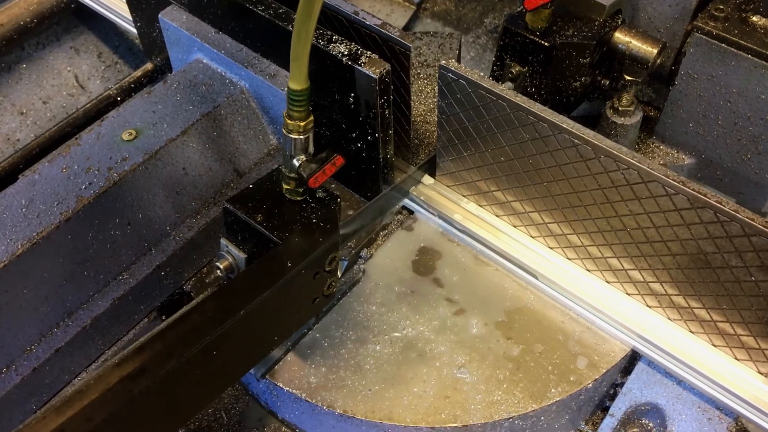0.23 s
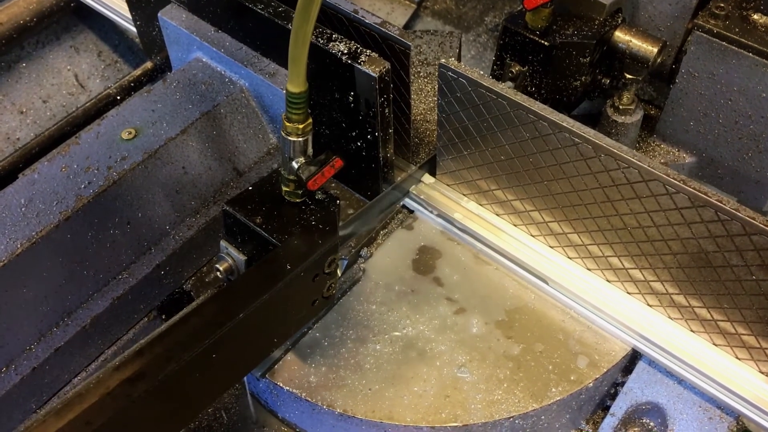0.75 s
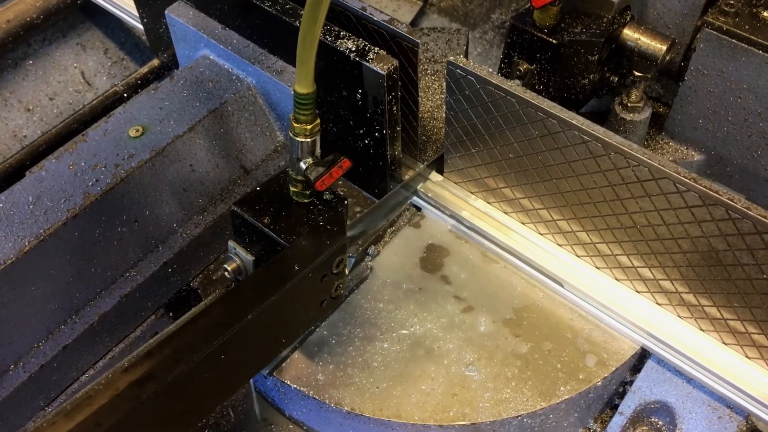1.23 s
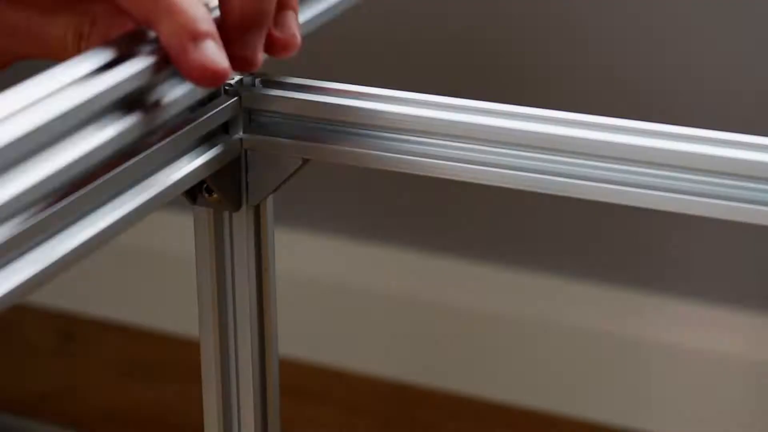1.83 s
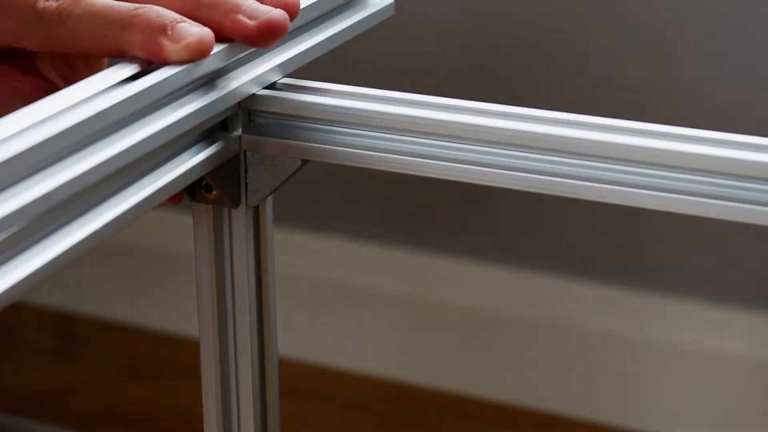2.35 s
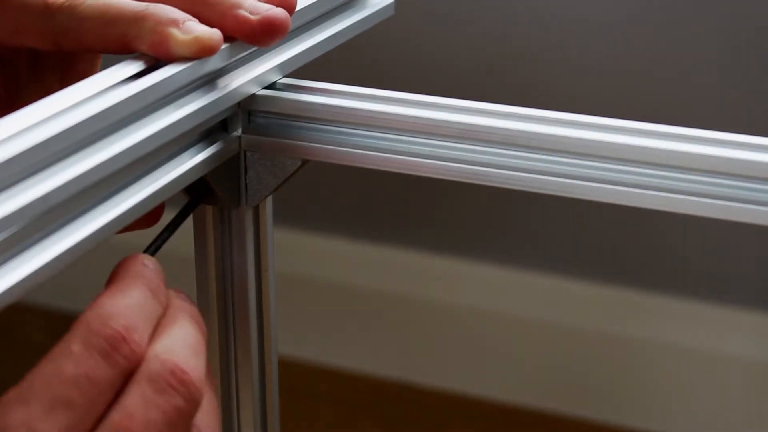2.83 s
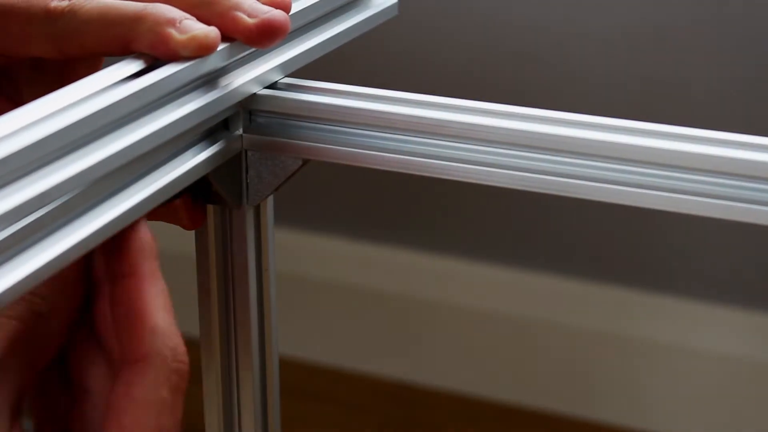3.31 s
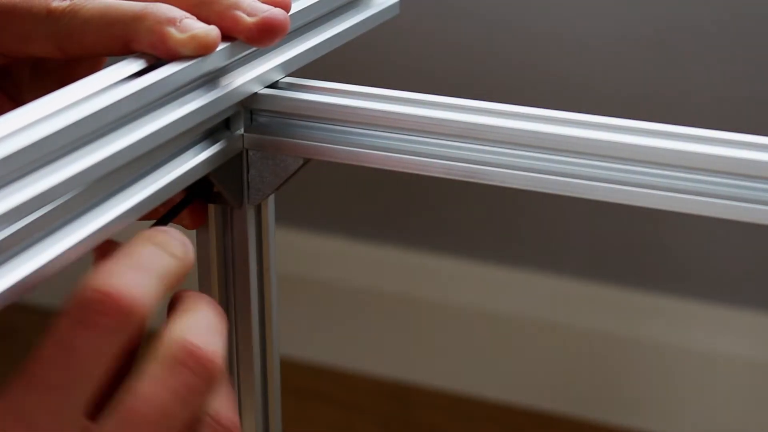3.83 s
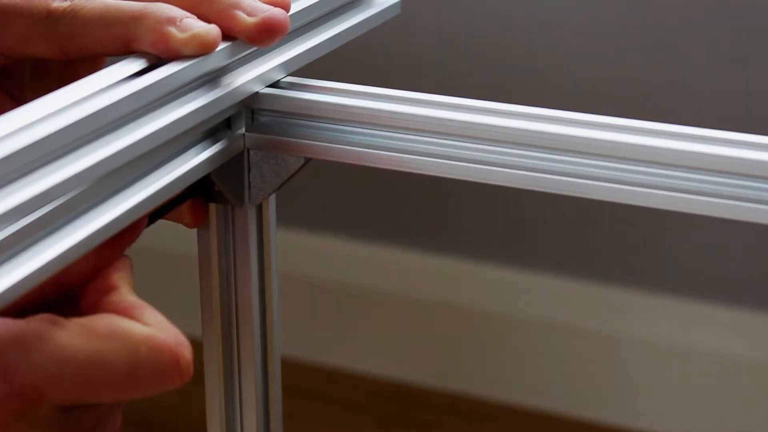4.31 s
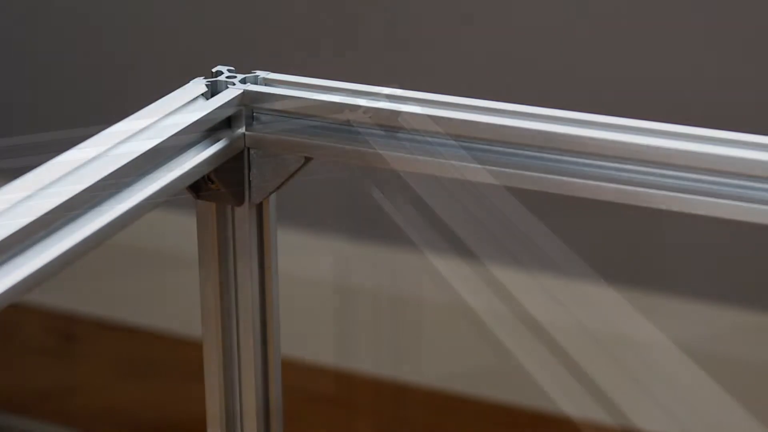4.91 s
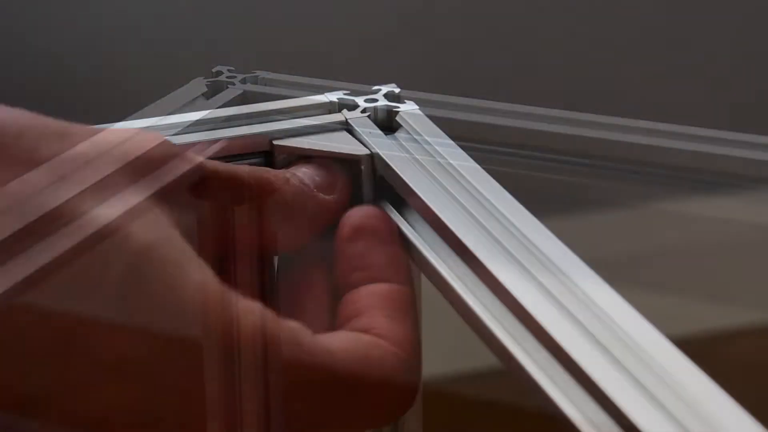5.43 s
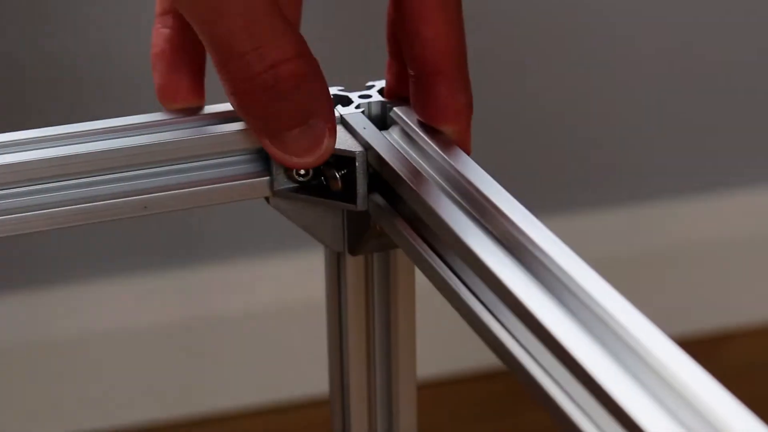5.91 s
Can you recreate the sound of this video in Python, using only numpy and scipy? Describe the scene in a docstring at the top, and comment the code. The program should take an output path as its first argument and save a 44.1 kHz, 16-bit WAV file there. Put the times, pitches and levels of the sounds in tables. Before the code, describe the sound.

First, close and loud, a saw blade whines and rasps through metal with wavering singing tones over a low motor hum. The sound cuts instantly to a faint hissy room. Hard aluminium knocks come first, then sparse small tool ticks and soft bumps, a sharp burst of clatter, snaps and scraping, and finally dull pats, finger rubs and tiny clicks. Close, centred, with a short room tail.

```python
"""A circular saw sings and hisses through an aluminium extrusion and stops abruptly; in a quiet room a bar is laid
on an aluminium frame, a hex key ticks in a corner bracket, the bar clatters off, fingers fit another bracket.
Saw: uneven tooth strokes drive tooth-rate partials, chatter, chip hiss, work and blade resonances; sines add hum.
Assembly: knocks and ticks are noise clashes with fading modes, slides are coloured grit, snaps are single swings.
Bumps wake low frame modes, rubs are filtered noise, and a short room tail follows the contacts; the channels match."""
import sys
import numpy as np
from scipy import signal
from scipy.fft import rfft, irfft
from scipy.io import wavfile
from scipy.ndimage import uniform_filter1d, map_coordinates

SR = 44100
rng = np.random.default_rng(int(sys.argv[2]) if len(sys.argv) > 2 else 0)


def master_out(mix):
    """Clip the mix to full scale and print it as 16-bit PCM to the path in sys.argv[1]."""
    frames = np.transpose(np.atleast_2d(mix))
    ceiling = np.clip(frames, -1, 1)
    pcm = np.round(ceiling * 32767).astype(np.int16)
    wavfile.write(sys.argv[1], SR, pcm)


N = 272097
TIME = np.arange(N) / SR
AGE = TIME[:SR // 2]  # time since a contact began
SAW_STOP_S = 1.758

# load on the blade, which rises where it meets thicker walls of the profile: t/s, load/dB
LOAD = [(0, -18.5), (0.035, -29.5), (0.11, -29.5), (0.17, -25), (0.34, -25.5), (0.48, -24), (0.56, -26.5),
        (0.64, -21), (0.85, -25.5), (0.98, -25.5), (1.1, -28.5), (1.33, -25), (1.75, -27)]
# colour of rubbing and of dull pats: f/Hz, relative level per Hz/dB
RUB_COLOUR = [(80, -30), (230, -10), (400, -16.5), (560, 2.5), (800, -6), (2200, -3.5), (4500, -10.5),
              (15500, -13.5)]


def amp(db):
    """Decibels to gain."""
    return 10 ** (np.asarray(db) / 20)


def unit(x):
    """Scale to rms 1."""
    return x / np.sqrt(np.mean(x ** 2))


def sine(phase):
    """Sine at rms 1 from a phase in radians."""
    return np.sqrt(2) * np.sin(phase)


def curve(table):
    """The (time, value) points of a table, joined by straight lines."""
    times, values = np.transpose(table)
    return np.interp(TIME, times, values)


def wander(rate):
    """Smooth chance with spread 1 that changes about rate times a second."""
    spectrum = rfft(rng.standard_normal(N))
    hz = np.arange(len(spectrum)) * SR / N
    return unit(irfft(spectrum * np.exp(-(hz / rate) ** 2), N))


def colour(x, points, tilt_db=0, patchy_db=0, patch_hz=260, size=2048):
    """Causal filter through (Hz, dB) points, with tilt per octave and chance resonances; white noise keeps its power."""
    hz, db = np.transpose(points)
    bins = np.fft.rfftfreq(size, 1 / SR)
    octave = np.log2(np.maximum(bins, 20))
    patches = np.interp(bins, patch_hz * np.arange(len(bins)), rng.standard_normal(len(bins)))
    shape_db = np.interp(octave, np.log2(hz), db)
    tilted_db = tilt_db * np.maximum(octave, np.log2(500))  # flat below 500 Hz
    gain = amp(shape_db + tilted_db + patchy_db * patches)
    # folding the cepstrum gives minimum phase: no sound ahead of its cause
    cepstrum = irfft(np.log(gain))
    cepstrum[1:size // 2] *= 2
    cepstrum[size // 2 + 1:] = 0
    response = irfft(np.exp(rfft(cepstrum)))
    return signal.fftconvolve(x, response / np.linalg.norm(response))[:len(x)]


def resonate(x, hz, width):
    """One resonance driven by x, at rms 1."""
    return unit(signal.lfilter(*signal.iirpeak(hz, hz / width, SR), x))


def add(track, s, sound):
    """Mix a sound into the track from time s."""
    start = int(s * SR)
    track[start:start + len(sound)] += sound[:N - start]


def swell(rise, t60, length=0):
    """Envelope of a contact: it builds, lasts, then dies away."""
    build = np.minimum(AGE / max(rise, 1 / SR), 1)
    fading_time = np.maximum(AGE - max(rise, length), 0)
    return build * np.exp(-np.log(1000) * fading_time / t60)


def grit(rough_db):
    """Noise made of tiny contacts of unequal size, under a millisecond each."""
    sizes = np.repeat(amp(rough_db * rng.standard_normal(len(AGE))), 32)[:len(AGE)]
    return unit(sizes * rng.standard_normal(len(AGE)))


def ring(modes, rise, tilt_db=0, longest=np.inf, scatter_db=2.5):
    """Fading modes; each blow shares its energy a little differently."""
    mode_hz, mode_db, mode_t60 = np.transpose(modes)
    gains = amp(mode_db + tilt_db * np.log2(mode_hz) + scatter_db * rng.standard_normal(len(mode_hz)))
    gains *= np.sqrt(2) / np.linalg.norm(gains)
    total = np.zeros(len(AGE))
    for gain, hz, t60 in zip(gains, mode_hz, mode_t60):
        tone = np.sin(2 * np.pi * (hz * AGE + rng.random()))
        total += gain * swell(rise, min(t60, longest)) * tone
    return total


def blow(clash, modes, rise, tilt_db, clash_t60, clash_db, ring_db, longest):
    """Metal on metal: a short clash whose resonances vary by the spot struck, and the part's own modes ringing on."""
    contact = grit(rough_db=1.0) * swell(rise, clash_t60)
    crash = colour(contact, clash, tilt_db, patchy_db=4.5, patch_hz=210)
    return amp(clash_db) * crash + amp(ring_db) * ring(modes, rise, tilt_db, longest)


def room_tone():
    """Quiet hiss of filtered noise with a faint low drone whose phase drifts."""
    # hiss colour: f/Hz, relative level per Hz/dB
    hiss_colour = [(50, -42), (105, -11), (150, -16), (235, -2), (330, -11.5), (550, 2), (4000, -8.5),
                   (15500, -13.5)]
    hiss = amp(-55) * colour(rng.standard_normal(N), hiss_colour)
    drone = amp(-77.5) * np.sin(2 * np.pi * 106 * TIME + wander(3.5))
    return hiss + drone


def walls(x, t60, wet_db):
    """The short, duller answer of a small room: a fading noise tail."""
    burst = rng.standard_normal(len(AGE)) * swell(rise=0.042, t60=t60)
    tail = colour(burst, [(500, 0), (4000, -6.0), (15000, -13)])
    return x + amp(wet_db) * signal.fftconvolve(x, tail / np.linalg.norm(tail))[:N]


def rubbing():
    """Uneven friction of fingers and bar along the frame, in strokes that build, last and fade."""
    # strokes: t/s, length/s, level/dB
    strokes = [(1.851, 0.079, -49.5), (2.54, 0.1, -55.5), (2.8, .28, -53), (4.967, 0.22, -44),
               (5.214, 0.095, -50.5), (5.8, 0.1, -48.5), (5.976, 0.24, -51.5)]
    pressure = np.zeros(N)
    for s, length, db in strokes:
        add(pressure, s, amp(db) * swell(rise=0.013, t60=0.29, length=length))
    friction = rng.standard_normal(N) * amp(2.7 * wander(125))
    return pressure * unit(colour(friction, RUB_COLOUR))


def bumps():
    """Soft pushes give a dull pat and wake the low bending of the frame, or rock it as a whole."""
    # hands bump the frame: t/s, nominal level/dB
    pushes = [(2.116, -33), (2.275, -40), (2.336, -37.5), (2.381, -43), (3.141, -43), (3.225, -38),
              (4.955, -32), (5.143, -26.5), (5.496, -37), (5.659, -29), (5.735, -29), (5.788, -39.5),
              (5.85, -38), (5.93, -39)]
    # bending modes of the frame: f/Hz, relative level/dB, t60/s
    bending = [(488, -4, 0.14), (546, 3, 0.066), (621, 3, 0.093), (700, 7, 0.018), (733, -16, 0.16),
               (1100, -5, 0.05)]
    # the whole frame rocks on its support: t/s, level/dB
    thuds = [(4.613, -53), (5.027, -53), (5.16, -57), (5.88, -58)]
    # modes of that rocking: f/Hz, relative level/dB, t60/s
    rocking = [(122, 2.5, 0.14), (248, 6, 0.18)]
    track = np.zeros(N)
    for s, db in pushes:
        push = rng.standard_normal(len(AGE)) * swell(rise=0.002, t60=0.072)
        pat = colour(push, RUB_COLOUR, tilt_db=-3.5)
        add(track, s, amp(db) * (amp(-5.0) * ring(bending, rise=0.0021) + amp(-10.0) * pat))
    for s, db in thuds:
        add(track, s, amp(db) * ring(rocking, rise=0.0055))
    return track


def zings():
    """Light sliding wakes one thin resonance of key or bracket for as long as the parts slide."""
    # slides: t/s, level/dB, length/s, resonance f/Hz
    thin_slides = [(3.034, -51, 0.013, 4350), (5.053, -28.5, 0.011, 7970), (5.111, -48, 0.071, 7360),
                   (5.45, -48, 0.0066, 4760), (5.795, -50.5, 0.087, 7900), (5.978, -56, 0.055, 7760)]
    track = np.zeros(N)
    for s, db, length, hz in thin_slides:
        tone = resonate(resonate(grit(rough_db=3.5), hz, 600), hz, 600)  # twice through: steeper sides
        add(track, s, amp(db) * tone * swell(rise=0.0049, t60=0.039, length=length))
    return track


def scrapes():
    """Metal edges slide on each other: dense slips, coloured by the stiffness of the contact."""
    # slides: t/s, level/dB, length/s, contact pitch f/Hz
    slides = [(2.472, -51, 0.028, 2000), (2.834, -40.5, 0.021, 2720), (3.381, -52, 0.023, 7000),
              (3.638, -51.5, 0.018, 1850), (4.761, -26, 0.0049, 2970), (4.82, -22.5, 0.013, 2970),
              (4.828, -27.5, 0.05, 3100), (4.887, -35.5, 0.004, 1490), (4.914, -31, 0.0066, 2500),
              (4.9195, -20.5, 0.0017, 1860), (4.925, -24, 0.033, 1810), (4.952, -24.5, 0.003, 9100),
              (4.998, -32, 0.0018, 1650), (5.046, -37, 0.015, 2260), (5.322, -43, 0.087, 7600),
              (5.493, -36.5, 0.031, 9700), (5.852, -30.5, 0.046, 14000), (5.878, -33, 0.019, 2630),
              (6.126, -37.5, 0.065, 8550)]
    # slip colour: multiple of the contact pitch, relative level per Hz/dB
    slip_colour = np.array([(.15, -27), (.55, -1.5), (.9, 11), (1.2, 8.5), (1.7, 3), (6, -2.5)])
    ease_s = 0.14  # a slide this long builds all the way through; shorter ones start ever more abruptly
    even_hz, stiff_tilt_db = 2130, 4  # stiffer contacts are brighter, by up to this many dB per octave
    track = np.zeros(N)
    for s, db, length, hz in slides:
        rise = length ** 2 / ease_s
        tilt_db = stiff_tilt_db * np.tanh(2 * np.log2(hz / even_hz))
        slips = grit(rough_db=2.8) * swell(rise, t60=0.1, length=length)
        scrape = colour(slips, slip_colour * [hz, 1], tilt_db, patchy_db=6.5, patch_hz=152.0)
        add(track, s, amp(db) * scrape)
    return track


def snaps():
    """An edge catches or breaks free with a dry snap: one sharp swing of the metal, with its bass removed."""
    # snaps: t/s, peak level ahead of the high-pass/dB, f/Hz
    catches = [(4.364, -29, 10000), (4.762, -15, 4000), (4.8222, -12, 5500), (4.9208, -4.5, 2200),
               (4.9995, -19, 2400), (4.9566, -10, 10000), (5.0592, -18, 6000), (5.4512, -19, 9000),
               (5.5935, -25, 8000)]
    peak_cycles = 0.5  # the swing's envelope peaks after half a cycle
    track = np.zeros(N)
    for s, db, hz in catches:
        age = AGE * hz / peak_cycles
        swing = age * np.exp(1 - age) * np.cos(2 * np.pi * hz * AGE)
        high_pass = signal.butter(2, hz / 2, "high", fs=SR)
        add(track, s, amp(db) * signal.lfilter(*high_pass, swing))
    return track


def ticks():
    """Key and bolt tap the bracket, which the fingers keep from ringing long."""
    # taps: t/s, nominal level/dB, brightness/dB per octave
    taps = [(2.213, -47, -3.5), (2.285, -44, -5.5), (2.319, -35.5, -3), (2.342, -44, -5), (2.73, -38, 2.5),
            (2.793, -29.5, 6), (2.812, -30.5, 4.5), (2.902, -26.5, 14), (2.912, -30, -1), (2.998, -34, 3.5),
            (3.139, -31, 2), (3.209, -38, 0), (3.221, -23.5, -0.5), (3.256, -34.5, -1), (3.433, -39.5, -5),
            (4.362, -44, 0.5), (4.444, -44.5, -2), (5.320, -32, 2.5), (5.439, -32, 3), (5.4498, -23.5, 2.5),
            (5.497, -37, -6), (5.579, -40.5, -5.5), (5.591, -28, 2), (5.658, -35.5, -6), (6.048, -41.5, 2)]
    # clash colour: f/Hz, relative level per Hz/dB
    tap_colour = [(90, -42), (350, -22), (600, -9), (3800, -2.5), (5400, -5.5), (8500, 1.5), (15500, 1)]
    # modes of the corner bracket: f/Hz, relative level/dB, t60/s
    bracket = [(2740, 6.5, 0.12), (3770, 3.5, 0.17), (4760, 4, 0.16), (6500, 12.5, 0.096),
               (7940, 15.5, 0.096), (8270, 18, 0.082), (9340, 12, 0.066), (12200, 15, 0.07),
               (13900, 10, 0.054)]
    track = np.zeros(N)
    for s, db, tilt_db in taps:
        tap = blow(tap_colour, bracket, rise=0.0007, tilt_db=tilt_db,
                   clash_t60=0.091, clash_db=0.5, ring_db=-7, longest=0.23)
        add(track, s, amp(db) * tap)
    return track


def knocks():
    """The loose bar hits the frame: harder blows are brighter, the spot favours one mode, and the hand damps the ring."""
    # blows: t/s, nominal level/dB, longest t60 that the grip allows/s, f that the struck spot favours/Hz
    bar_blows = [(1.976, -21, 0.091, 6780), (1.989, -16.5, 0.13, 3246), (2.026, -34.5, 0.13, 8400),
                 (2.104, -22.5, 0.066, 7950), (2.159, -44, 0.091, 8060), (4.545, -25, 0.1, 2180),
                 (4.573, -32, 0.2, 8355), (4.590, -22, 0.064, 2180), (4.604, -15, 0.064, 9590),
                 (4.61, -15, 0.9, 4441), (4.622, -28, 0.13, 8400), (4.715, -41.5, 0.02, 7730)]
    # modes of the loose bar: f/Hz, relative level/dB, t60/s
    bar = [(1809, -19, 0.7), (2180, -2, 0.09), (2830, -1, 0.08), (3246, 1, 0.14), (3758, -2, 0.13),
           (4441, -5, 0.13), (5954, -7, 0.35), (6783, -2, 0.11), (7265, -4, 0.16), (7730, -3, 0.18),
           (8060, 3, 0.09), (8355, 3.5, 0.11), (9017, 2, 0.1), (9590, 1, 0.085), (10650, -3, 0.1),
           (11810, -2, 0.11)]
    # clash colour: f/Hz, relative level per Hz/dB
    clash = [(200, -45), (520, -0.5), (1400, -7.5), (2200, 2.5), (3400, 3.5), (5200, -4), (8400, -3),
             (15500, -4)]
    full_db, dulling = -34, 0.14  # tilt in dB per octave for each dB above or below full_db
    spot_gain_db, spot_octaves = 7, 0.06
    track = np.zeros(N)
    for s, db, longest, spot_hz in bar_blows:
        tilt_db = dulling * (db - full_db)
        modes = []
        for hz, mode_db, t60 in bar:
            closeness = np.exp(-(np.log2(hz / spot_hz) / spot_octaves) ** 2)
            modes.append((hz, mode_db + spot_gain_db * closeness, t60))
        knock = blow(clash, modes, rise=0.0019, tilt_db=tilt_db,
                     clash_t60=0.095, clash_db=-1.5, ring_db=-1.0, longest=longest)
        add(track, s, amp(db) * knock)
    return track


def hum_and_sidebands():
    """Low motor hum, plus two saw-tone sidebands near 1 and 1.3 kHz, with wavering levels and phases."""
    # hum and the two sidebands: f/Hz, usual level/dB
    tones = [(51, -46), (200, -47), (274, -55), (301, -46), (467, -54.5), (995, -39.5), (1292, -42.5)]
    total = np.zeros(N)
    for hz, db in tones:
        total += amp(db + 3.9 * wander(33)) * sine(2 * np.pi * hz * TIME + 0.31 * wander(19))
    return total


def work_and_blade_ring(force, chip_db):
    """Tooth strokes excite resonances: the work rings near 1220 Hz, the blade rings higher."""
    # resonances of work (first row) and blade: f/Hz, width/Hz, level against the chips/dB
    resonances = [(1220, 18, -12), (3350, 160, -12), (3930, 80, -14), (5450, 220, -11), (6650, 170, -16),
                  (7456, 140, -11), (9150, 220, -13.5), (10987, 160, -14)]
    total = np.zeros(N)
    for hz, width, db in resonances:
        total += amp(db + chip_db) * resonate(force * rng.standard_normal(N), hz, width)
    return total


def blade_whine():
    """The cut keeps one mode of the blade singing, with wavering level and phase."""
    return amp(-42.5 + 1.82 * wander(20)) * sine(2 * np.pi * 9180 * TIME + 0.4 * wander(9))


def tooth_strokes(teeth, sharpness, uneven_db, scatter_db, count=50):
    """Cutting force: one stroke a tooth; unequal teeth repeat with every turn of the blade."""
    index = teeth.astype(int)
    tooth_db = uneven_db * rng.standard_normal(count)[index % count]
    stroke_db = scatter_db * rng.standard_normal(N)[index]
    return unit(amp(tooth_db + stroke_db) * np.exp(-sharpness * (teeth % 1)))


def cutting_noise(teeth, turn_db, group_db, count=50, order=5):
    """Noise of the teeth: part is fresh, part repeats with each turn, part with each group of five teeth."""
    def repeating(period):
        """One noise pattern read round and round, once every period teeth."""
        pattern = rng.standard_normal(int(period * N / teeth[-1]))
        pattern = pattern - uniform_filter1d(pattern, size=100, mode="wrap")  # fine detail of tooth edges: no bass
        return unit(map_coordinates(pattern, [teeth / period % 1 * len(pattern)], mode="wrap"))
    fresh = rng.standard_normal(N)
    return unit(fresh + amp(turn_db) * repeating(count) + amp(group_db) * repeating(order))


def chip_hiss(force, teeth, chip_db):
    """The strokes tear off chips: force-shaped cutting noise, coloured bright."""
    # chip colour: f/Hz, relative level per Hz/dB
    chip_colour = [(2000, -1.5), (4200, 8), (4950, 0), (6000, 4.5), (7000, -2), (9900, 2.5), (10400, -5),
                   (11700, 2), (14200, -11), (15700, -2)]
    tearing = force * cutting_noise(teeth, turn_db=-4, group_db=-6.5)
    return colour(tearing, chip_colour) * amp(chip_db)


def work_chatter(force, teeth, load_db):
    """Teeth shake the work and vice, which answer through many narrow resonances and shudder briefly."""
    # chatter colour: f/Hz, relative level per Hz/dB
    chatter_colour = [(35, -28), (55, -14), (90, -4), (280, -5), (370, -13.5), (600, -12), (850, 3.5),
                      (2100, 5.5), (2700, 1.5), (3900, -12), (5000, -18), (15000, -11)]
    # the work shudders briefly in the vice: t/s, extra chatter/dB
    shudders = [(1.445, 8), (1.67, 4)]
    level_db = -11.2 + 0.48 * load_db  # follows this share of the load's dB
    for s, db in shudders:
        level_db = level_db + db * np.exp(-((TIME - s) / 0.031) ** 2)
    shaking = force * cutting_noise(teeth, turn_db=0.5, group_db=-1.0)
    return colour(shaking, chatter_colour, patchy_db=2.6, patch_hz=20, size=8192) * amp(level_db)


def tooth_note(teeth, load_db, order=5):
    """Partials of the tooth rate, each trembling on its own as the teeth bite unevenly."""
    # steadier partials: multiple of the tooth rate, usual level/dB
    steady = [(1, -48), (6, -41.5), (7, -43), (8, -44), (9, -42)]
    # partials that swell with the singing:
    # multiple of the tooth rate, usual level/dB, share of the singing's dB, share of the load's dB
    sung_partials = [(2, -33.5, 0.5, 0.7), (3, -23.5, 0.9, 0.4)]
    # how strongly the work sings: t/s, singing/dB
    singing = [(0.0, -14), (0.26, -22.5), (0.386, -18), (0.822, -23.5), (0.872, -37), (0.964, -20),
               (1.134, -31.5), (1.182, -20.5), (1.26, -27), (1.318, -18.5), (1.53, -34), (1.56, -14.5),
               (1.632, -30), (1.706, -14.5), (1.74, -29)]
    # fourth partial, which swells on its own: t/s, level/dB
    fourth = [(0, -34), (0.34, -36), (0.4, -27), (0.756, -28), (0.856, -36), (1.07, -26.5), (1.134, -36),
              (1.29, -31.5), (1.74, -34)]
    # fifth partial, which swells on its own: t/s, level ahead of a 2.5 dB lift/dB
    fifth = [(0.0, -22), (0.024, -34), (0.192, -28.5), (0.352, -40), (0.488, -29), (0.91, -42.5),
             (1.308, -24), (1.346, -33), (1.74, -30)]
    extra_singing_db = curve(singing) + 23  # against the usual -23 dB
    extra_load_db = load_db + 25  # against the usual -25 dB
    partials = list(steady)
    for multiple, db, sung, loaded in sung_partials:
        partials.append((multiple, db + sung * extra_singing_db + loaded * extra_load_db))
    partials += [(4, curve(fourth)), (5, 2.5 + curve(fifth))]
    note = np.zeros(N)
    for multiple, db in partials:
        phase = 2 * np.pi * (round(multiple) * teeth + rng.random()) + 0.32 * wander(36)
        note += amp(db + 1.7 * wander(51)) * sine(phase)
    flutter = 1 + 0.18 * np.sin(2 * np.pi * teeth / order)  # once for each group of five teeth
    return flutter * note


def saw():
    """Teeth shake the work and tear off chips; the same strokes keep work and blade ringing over the motor."""
    # the blade speeds up a little as the cut settles
    usual_tooth_hz, start_sag_hz, settle_s = 413.7, 8, 0.1
    tooth_hz = usual_tooth_hz - start_sag_hz * np.maximum(1 - TIME / settle_s, 0)
    teeth = np.cumsum(tooth_hz * (1 + 0.002 * wander(12))) / SR  # teeth passed so far
    load_db = curve(LOAD)
    chip_db = load_db - 1.5
    force = tooth_strokes(teeth, sharpness=0.1, uneven_db=0.64, scatter_db=1.44)
    bite = amp(1.0 * wander(18))  # the feed grabs and eases
    cut = tooth_note(teeth, load_db) + work_chatter(force, teeth, load_db) + chip_hiss(force, teeth, chip_db)
    ringing = work_and_blade_ring(force, chip_db) + blade_whine()
    running = np.clip((SAW_STOP_S - TIME) / 0.0034, 0, 1)  # a few milliseconds of fade at the stop
    return running * (bite * cut + ringing + hum_and_sidebands())


def scene():
    """First the saw, then the assembly with its room tone; both channels carry the same sound."""
    # the sound drops out for an instant: from t/s, to t/s
    gap_start, gap_end = (5.263, 5.276)
    contacts = knocks() + ticks() + scrapes() + snaps() + zings() + bumps()
    assembly = walls(contacts, t60=0.14, wet_db=-26.5) + rubbing() + room_tone()
    gap = (TIME > gap_start) & (TIME < gap_end)
    mono = saw() + assembly * (TIME > SAW_STOP_S) * ~gap
    return np.array([mono, mono])


def record(dry):
    """A steep elliptic low-pass cuts the top above 15.8 kHz."""
    low_pass = signal.ellip(10, .2, 70, 15800, fs=SR, output="sos")  # ripple and stop-band depth in dB
    return signal.sosfilt(low_pass, dry)


dry = scene()
out = record(dry)
master_out(out)
```